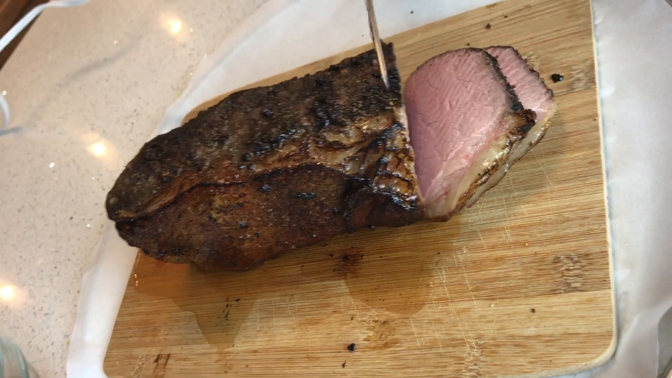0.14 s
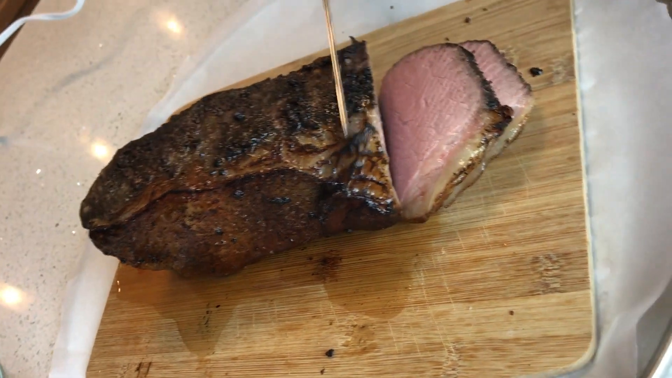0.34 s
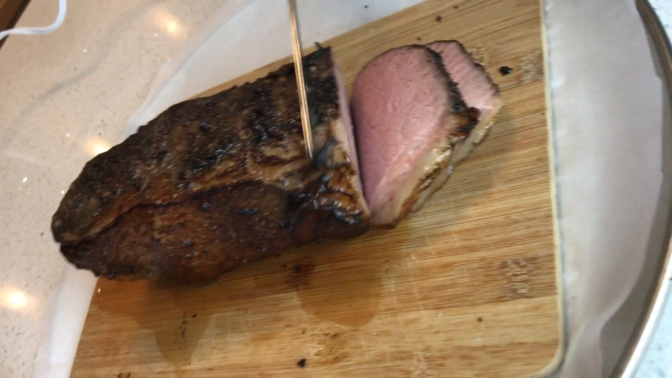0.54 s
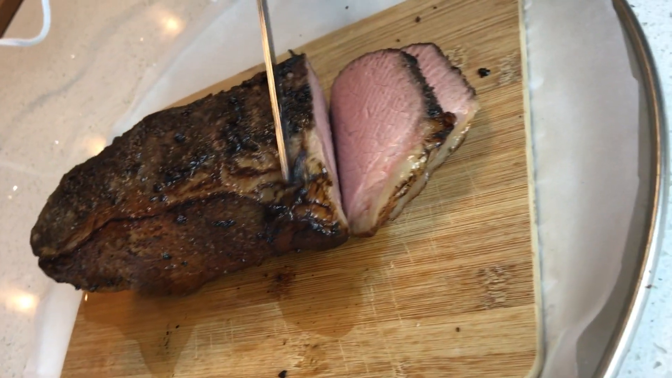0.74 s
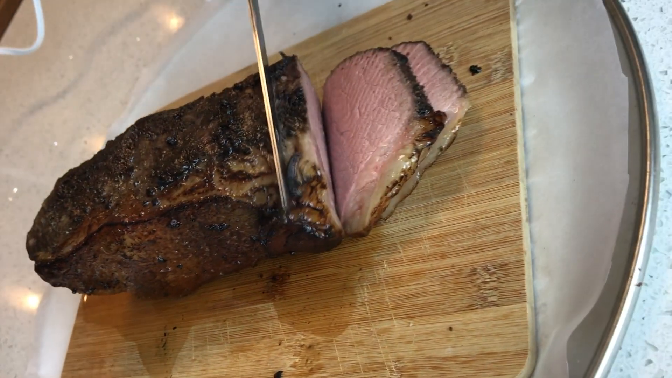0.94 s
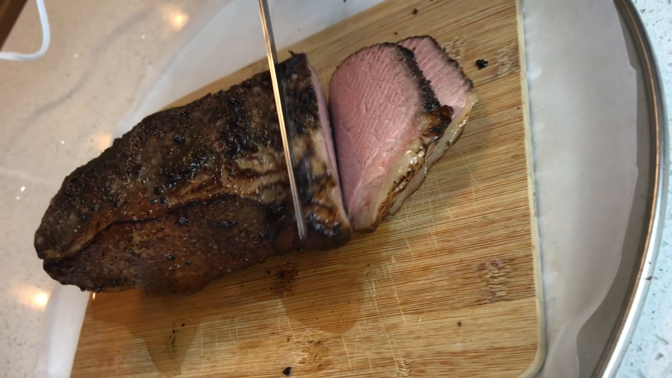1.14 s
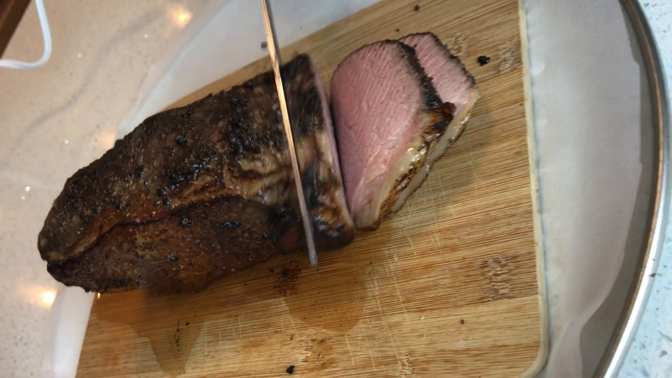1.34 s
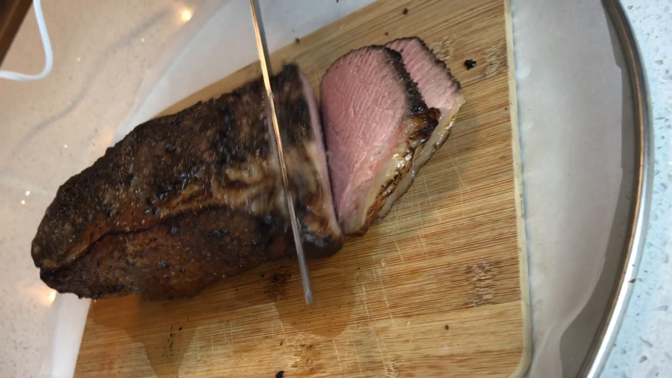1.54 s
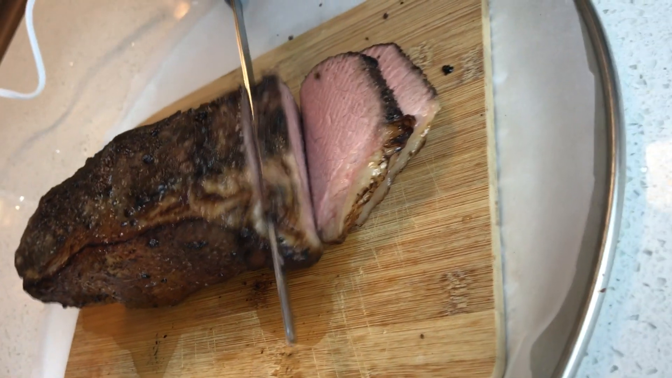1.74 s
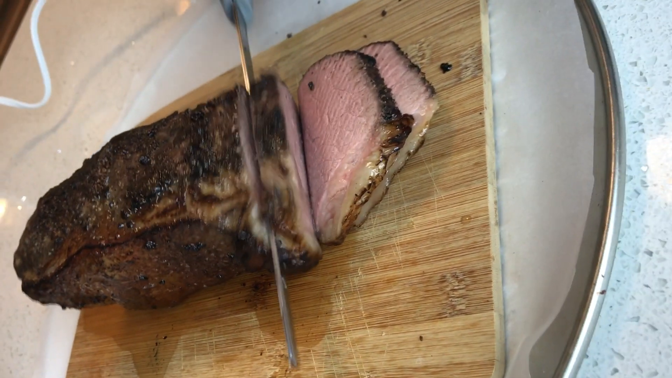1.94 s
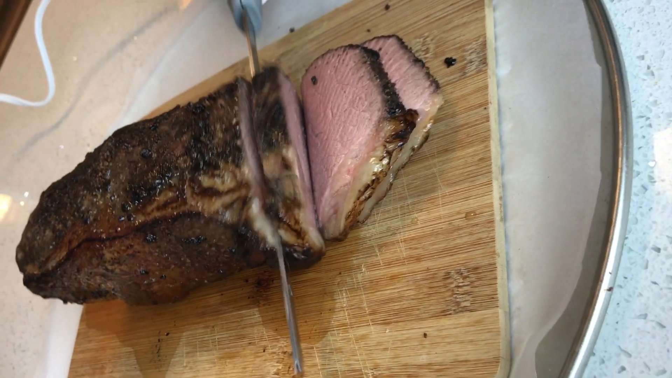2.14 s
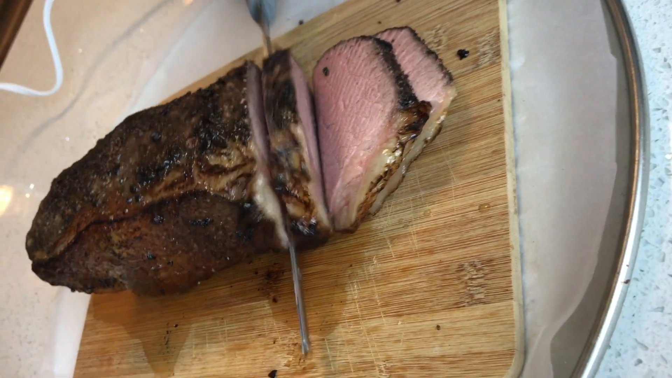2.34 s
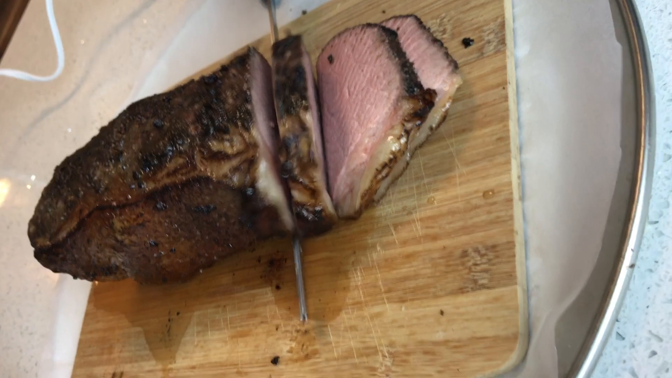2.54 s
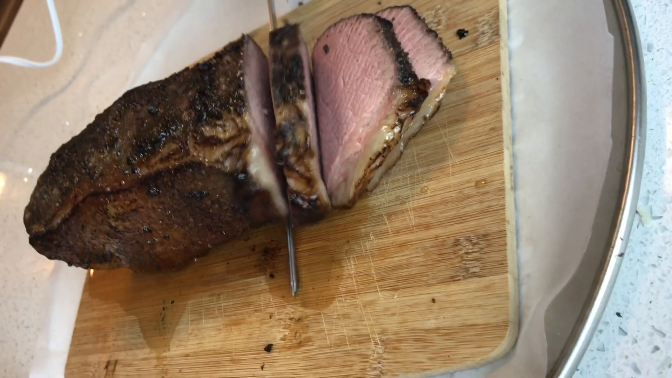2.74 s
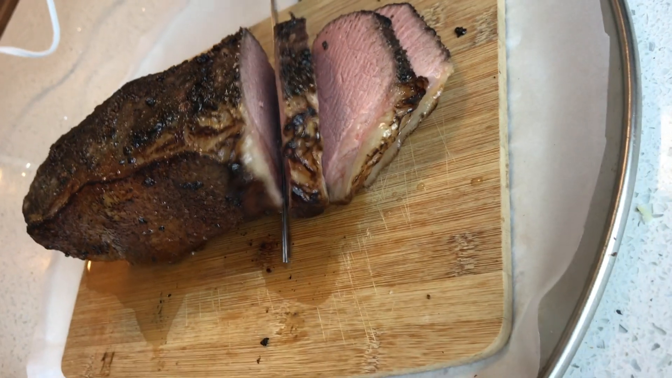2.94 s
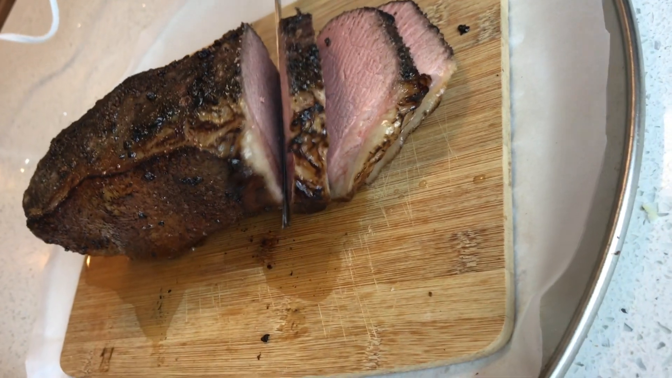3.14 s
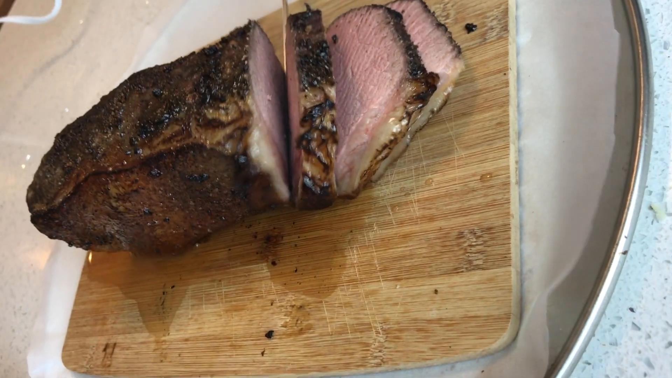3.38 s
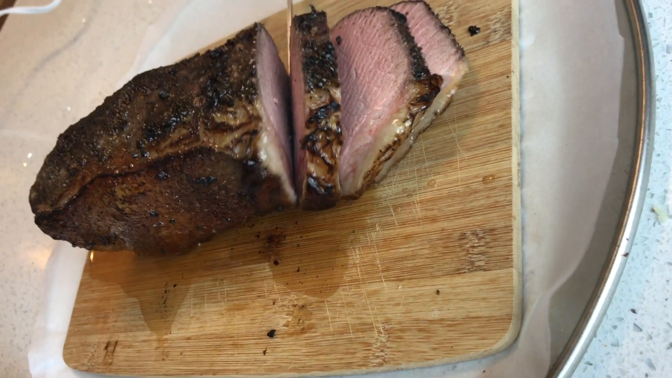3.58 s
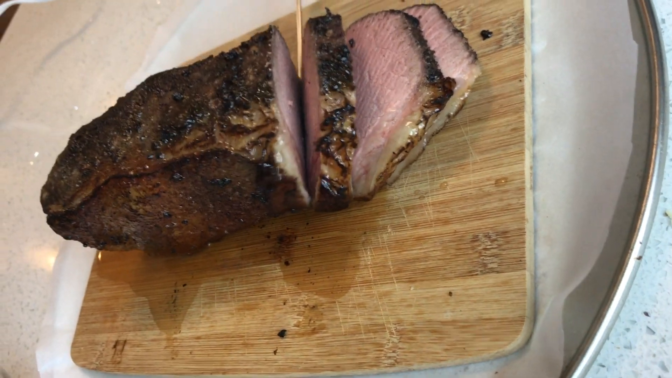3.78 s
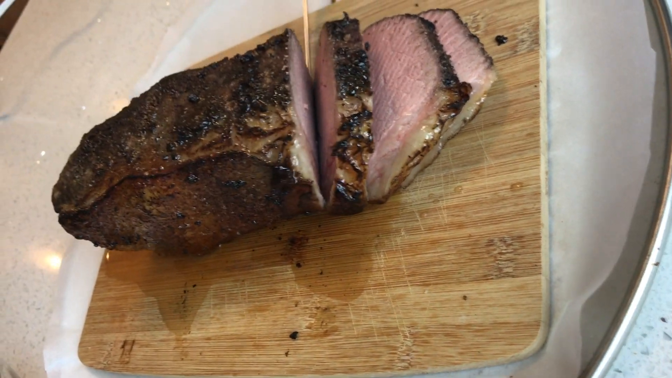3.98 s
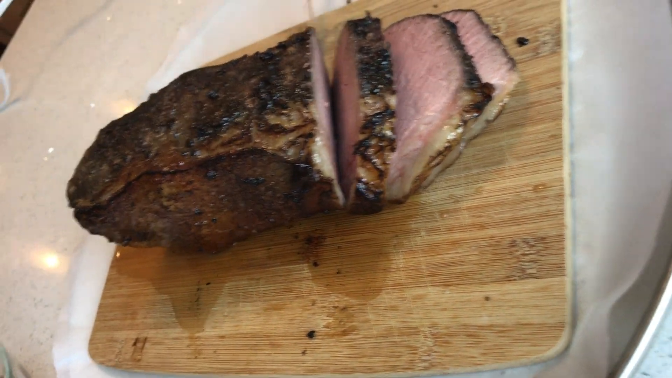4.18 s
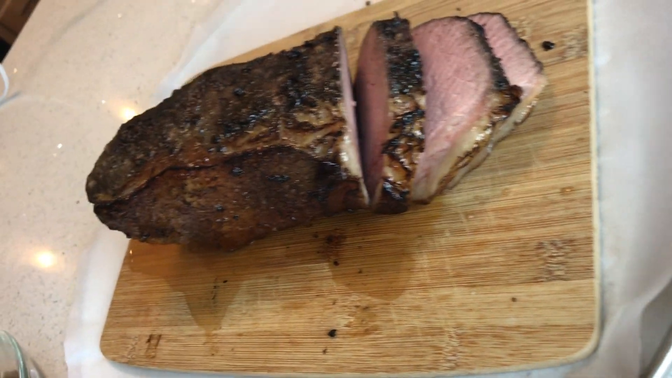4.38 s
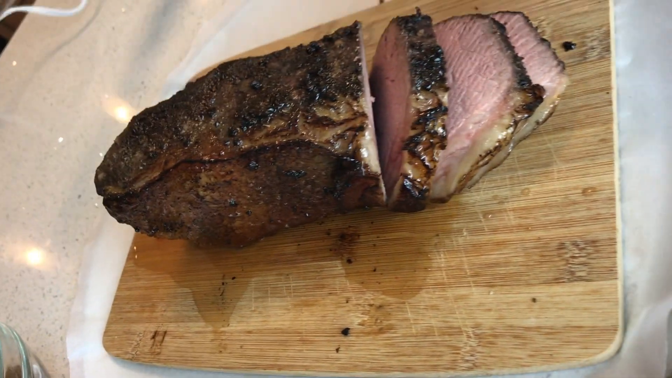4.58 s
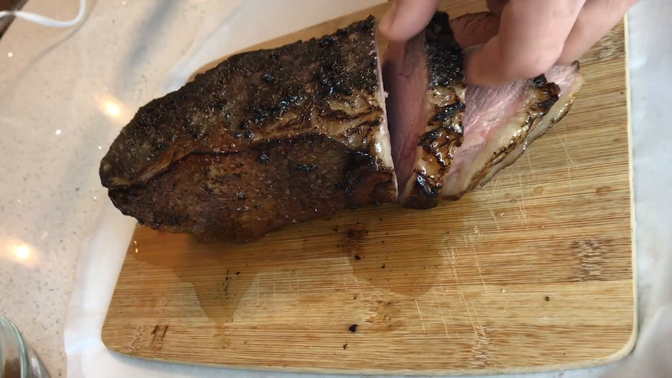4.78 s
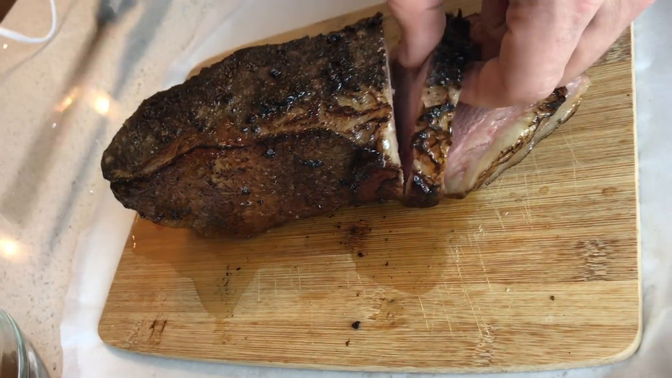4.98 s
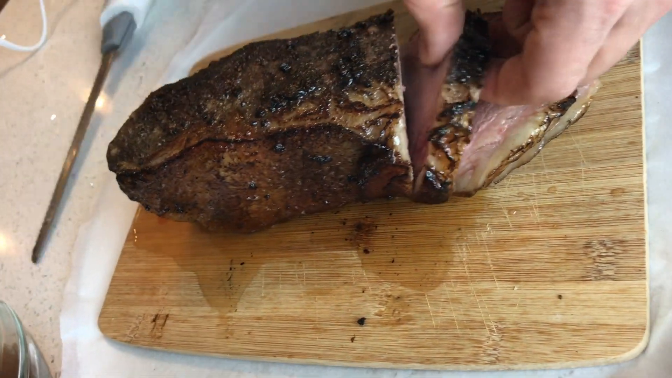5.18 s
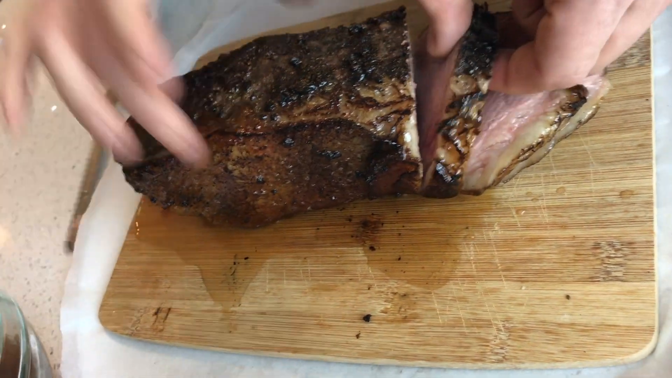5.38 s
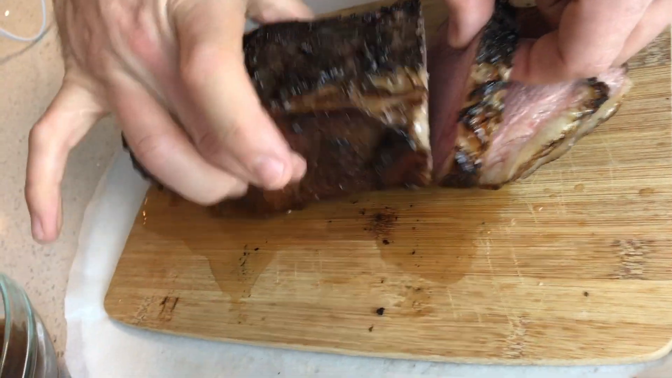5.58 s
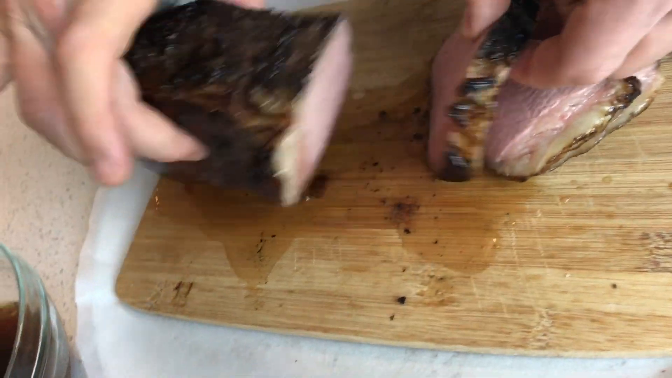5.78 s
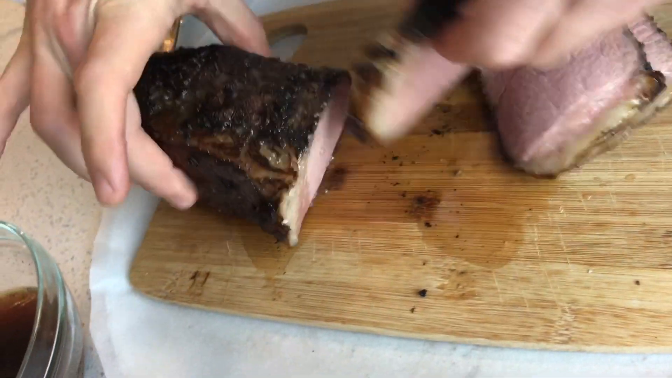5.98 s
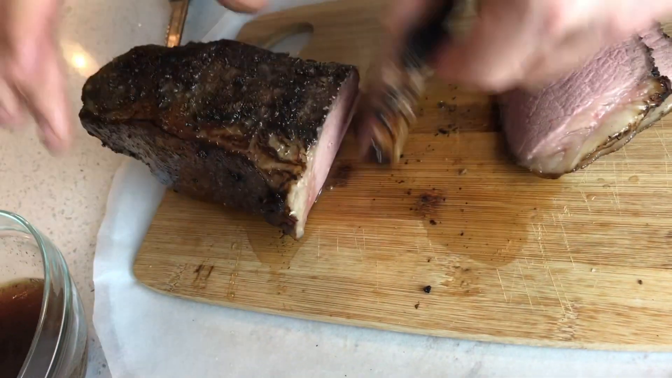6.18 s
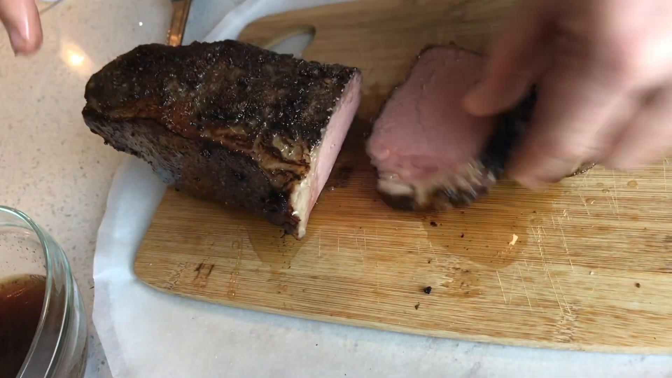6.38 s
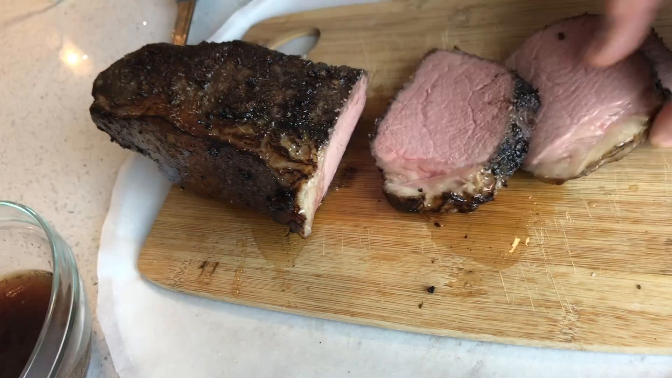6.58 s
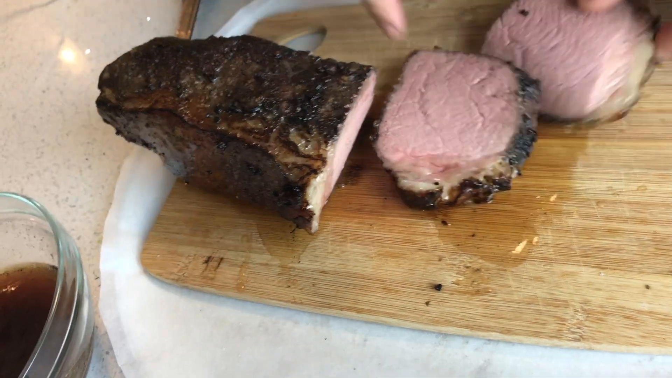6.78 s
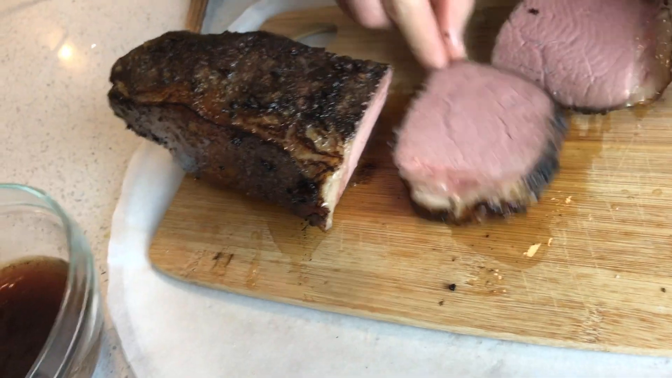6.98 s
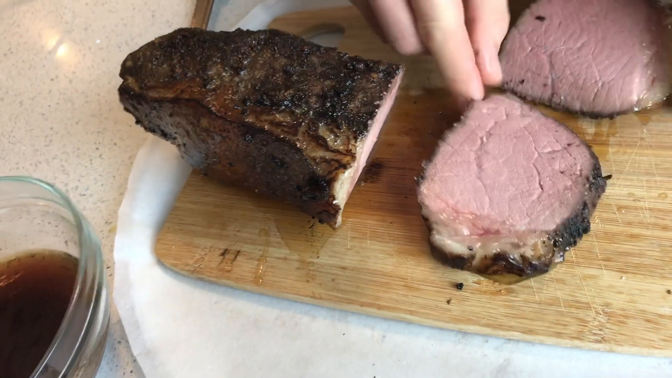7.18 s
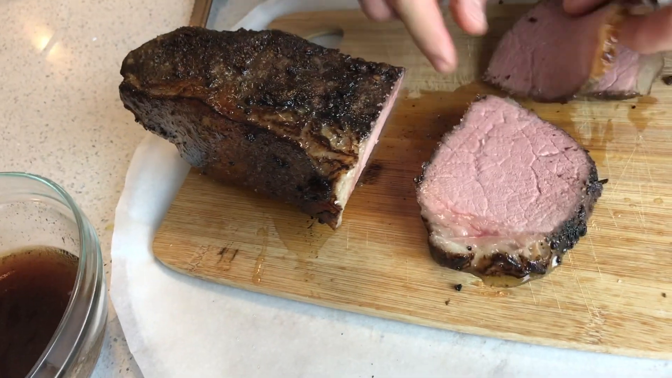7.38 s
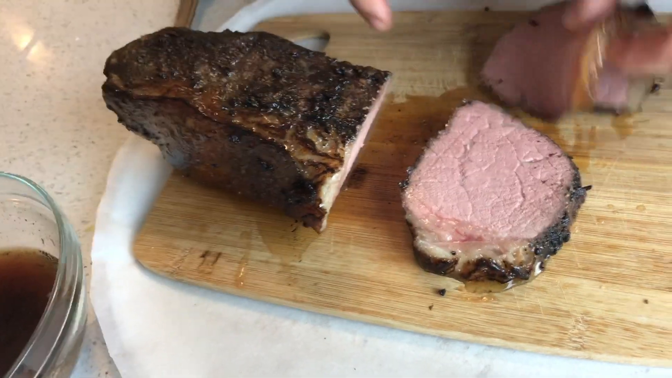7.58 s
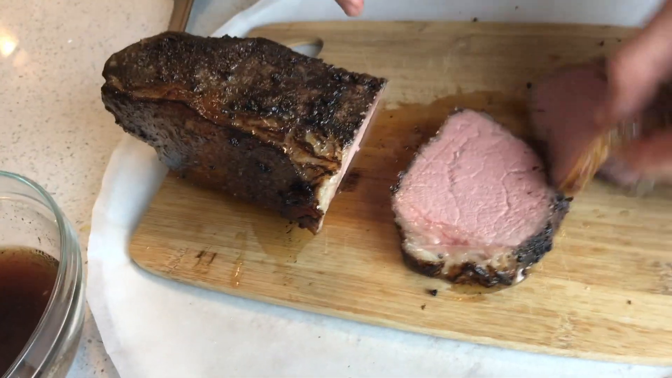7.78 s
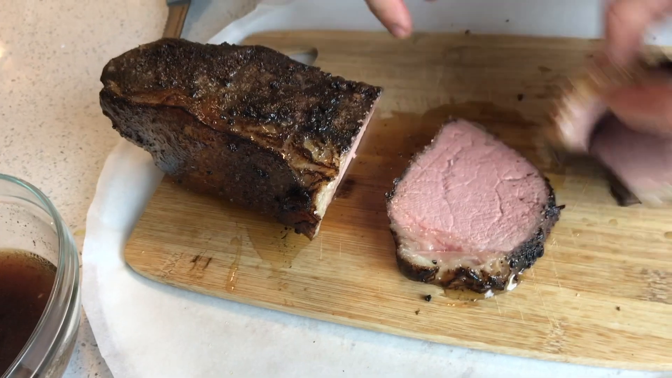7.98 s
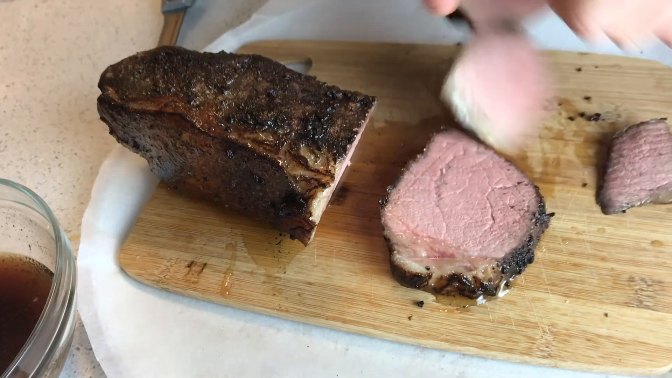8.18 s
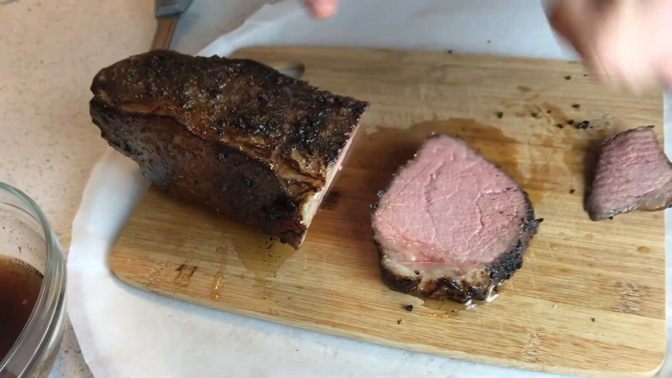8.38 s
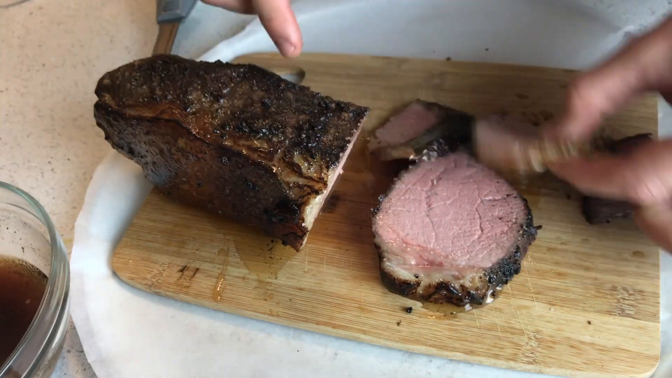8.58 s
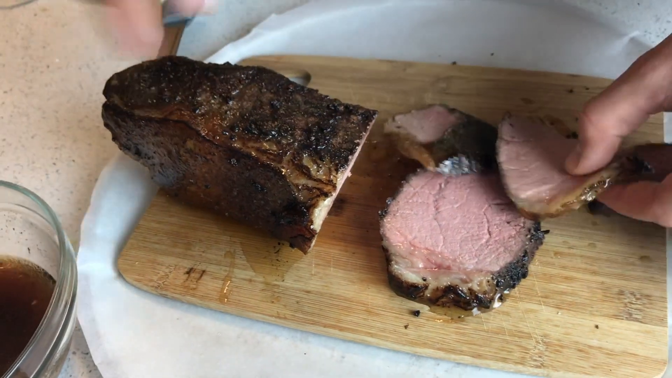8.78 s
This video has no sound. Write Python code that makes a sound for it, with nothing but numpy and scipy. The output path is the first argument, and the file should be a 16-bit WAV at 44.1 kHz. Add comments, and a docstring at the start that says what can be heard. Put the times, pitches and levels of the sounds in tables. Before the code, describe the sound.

An electric carving knife spins up at once, its high, gritty whine rising over the first second above a grinding hiss and a fast blade flutter. The pitch sags as it saws through a roast, lowest near 2.7 seconds, then creeps back up. From about 2.8 seconds the blades rattle harder against a wooden cutting board, with sharp clicks near 3.9 and 4.2. The power cuts at 4.2 and the whine falls away, gone by 5.8. Meanwhile the knife is laid down with clacks and low counter bumps between 5.0 and 5.3, and another clack at 5.6. A light knock follows at 6.0 and a crisp tick at 6.3. Then it is much quieter: hands slide wet slices over the board with faint rubs and tiny ticks, and a soft smack near 8.6. Everything is close, in a slightly reverberant kitchen with low room tone.

```python
"""A rising, gritty whine: an electric carving knife spins up, sags as it saws through a roast, rattles
against the cutting board and coasts to rest. Meshing gears make the whine, friction noise rings the
plastic housing, and the blades slap in every stroke. The knife is laid down with clacks and low bumps
that ring the kitchen counter; hands then push the roast aside and slide the wet slices about,
with soft rubs, smacks and ticks over the murmur of a quiet kitchen."""
import sys
import numpy as np
from scipy import signal
from scipy.fft import rfft, irfft, next_fast_len
from scipy.io import wavfile
from scipy.ndimage import uniform_filter1d

SR = 44100
rng = np.random.default_rng(int(sys.argv[2]) if len(sys.argv) > 2 else 0)


def pcm_store(signal):
    """Save signal as 16-bit PCM."""
    levels = np.round(np.clip(np.atleast_2d(signal), -1, 1) * 32767)
    wavfile.write(sys.argv[1], SR, levels.astype(np.int16).T)


N = 389403
TIME = np.arange(N) / SR


def gain_of(db):
    """Decibels to amplitude."""
    return 10 ** (np.asarray(db) / 20)


def unit_rms(x):
    """Normalisation to rms 1."""
    return x / np.sqrt(np.mean(x ** 2) + 1e-20)


def curve(points):
    """Linear interpolation of (time, value) points over the whole scene."""
    return np.interp(TIME, *np.transpose(points))


def spectrum_at(points, hz):
    """Interpolation of (frequency, value) points on a log frequency axis."""
    f, value = np.transpose(points)
    return np.interp(np.log(hz + 1), np.log(f + 1), value)


def filtered(x, response):
    """Linear filtering: the spectrum of x is multiplied by response(hz)."""
    size = next_fast_len(len(x) + 4096)
    return irfft(rfft(x, size) * response(np.fft.rfftfreq(size, 1 / SR)), size)[:len(x)]


def modes(table, hz):
    """Modal superposition: the causal response of resonances of alternating sign."""
    return sum(gain_of(db) * width / (width + 2j * (hz - f)) * (-1) ** k
               for k, (f, width, db) in enumerate(table))


def wander(rate_hz):
    """Random drift: low-passed noise of rms 1."""
    coarse = rng.standard_normal(N // 32 + 2)  # one value in 32 samples
    coarse = filtered(coarse, lambda hz: 1 / (1 + (hz / 32 / rate_hz) ** 4))
    return np.interp(np.arange(N) / 32, np.arange(len(coarse)), unit_rms(coarse))


def bell(hz, centre_hz, octaves):
    """A Gaussian hump on a log frequency axis."""
    return np.exp(-.5 * (np.log2((hz + 1) / centre_hz) / octaves) ** 2)


def swell_db(peak_s, half_width_s):
    """A Gaussian envelope in time, 6 dB down at half_width_s from its peak."""
    return -6 * ((TIME - peak_s) / half_width_s) ** 2


# gear mesh under power (time [s], frequency [Hz])
POWERED_MESH = [(0.0, 2784), (0.07, 2937), (0.2, 3388), (0.35, 3690), (0.55, 3900), (0.8, 3995),
                (1.0, 3986), (1.2, 3936), (1.8, 3750), (2.0, 3651), (2.2, 3500), (2.45, 3360), (2.7, 3316),
                (3.0, 3345), (3.6, 3408), (3.9, 3502), (4.22, 3635)]
TEETH_PER_STROKE, SHAFT_TURNS_PER_STROKE = 88, 11
POWER_OFF_S, LAID_DOWN_S = 4.22, 5.085
POWER_OFF, COASTED_S = TIME > POWER_OFF_S, np.maximum(TIME - POWER_OFF_S, 0)

def mesh_frequency():
    """Mesh frequency follows motor speed: a quick loss as the current ends, then steady friction."""
    quick_loss_hz = 583 * (1 - np.exp(-COASTED_S / .18))
    friction_loss_hz = 1880 * COASTED_S
    return np.maximum(curve(POWERED_MESH) - quick_loss_hz - friction_loss_hz, 50)


# mesh fundamental (time [s], level [dB])
MESH_LEVEL = [(0, -44), (.3, -36), (.65, -35.5), (.9, -39.5), (1.1, -36.5), (1.35, -41), (1.55, -36),
              (1.9, -34), (2.2, -34.5), (2.5, -50), (2.8, -52), (3.1, -42), (3.6, -42), (4.2, -41),
              (4.3, -52), (4.45, -50), (4.6, -46.5), (4.8, -49), (5.0, -60), (5.8, -80)]
# tones beside the mesh, each loudest as it crosses a resonance
# (multiple of the stroke rate [1], level [dB], resonance [Hz], bandwidth [Hz])
MESH_SIDEBANDS = [(85.25, -45, 3720, 240), (90.9, -45, 3520, 420)]
# hum of the board, twice a stroke, while the blades press on it (time [s], level [dB])
BOARD_HUM = [(0, -90), (2.78, -80), (2.84, -61), (3.45, -61), (3.7, -56), (4.0, -53), (4.2, -54),
             (4.3, -75), (5.8, -90)]
# mesh overtones (multiple of the mesh frequency [1], relative level [dB])
MESH_OVERTONES = [(3, -4), (4, 3), (5, -8), (6, 4), (8, 0), (10, -1)]
# magnetic pull on the shaft (multiple of the shaft speed [1], level relative to the grinding [dB])
SHAFT_ORDERS = [(1, -27), (2, -19), (3, -22)]
# tones that sing out in turn as the blades sink; the row at 264 is the third harmonic of the mesh (multiple of
# the stroke rate [1], level [dB], peak time [s], half-width [s])
STROKE_ORDERS = [(4, -63, 3.6, .8), (4, -60, 2.25, .25), (6, -57, 4.05, .25), (7, -59, 3.0, .25),
                 (10, -56, 3.65, .3), (12, -56.5, 3.85, .4), (13, -54, 3.1, .3), (14, -52, 4.05, .2),
                 (15, -55, 3.0, .3), (19, -55, 1.3, .7), (19, -54, 3.1, .35), (20, -51, 3.05, .3),
                 (21, -48, 3.05, .4), (22, -49, 2.7, .7), (23, -45.5, 3.2, .9), (25, -52, 1.15, .4),
                 (33, -50, 2.3, .3), (11, -55, .9, .6), (231, -61, 1.2, .35), (264, -60, 2.2, .9)]

def whine(strokes, mesh_hz, grind_db, second_harmonic_db):
    """Periodic forcing: gears, shaft and blades radiate fluttering multiples of the stroke rate."""
    out, phase = np.zeros(N), 2 * np.pi * strokes
    tones = [(TEETH_PER_STROKE, curve(MESH_LEVEL)), (2 * TEETH_PER_STROKE, second_harmonic_db)]
    for order, db, hz, width in MESH_SIDEBANDS:
        detuning = 2 * (mesh_hz * order / TEETH_PER_STROKE - hz) / width
        tones.append((order, db - 10 * np.log10(1 + detuning ** 2) + 1.2 * wander(4) - 12 * POWER_OFF))
    for order, db in tones:
        amplitude = np.sqrt(2) * gain_of(db + 2.2 * wander(30))
        out += amplitude * np.sin(order * (phase + 2 * np.pi * .0006 * wander(35)))
    out += np.sqrt(2) * gain_of(curve(BOARD_HUM)) * np.sin(2 * phase)
    # the overtones stand out once the power is off, until the counter damps them
    overtone_db = grind_db - 33 + 13.5 * np.minimum(COASTED_S / .55, 1) - 3 * (TIME > LAID_DOWN_S)
    for order, db in MESH_OVERTONES:
        housing_db = 5 * bell(order * mesh_hz, 7500, .2)  # a swell on crossing a housing resonance
        amplitude = gain_of(overtone_db + db + housing_db + 3.5 * wander(11))
        out += amplitude * np.sin(order * TEETH_PER_STROKE * phase)
    powered = ~POWER_OFF
    for order, db in SHAFT_ORDERS:
        amplitude = powered * gain_of(grind_db + db + 2.5 * wander(8))
        cycles = order * SHAFT_TURNS_PER_STROKE * strokes + .07 * wander(14)
        out += amplitude * np.sin(2 * np.pi * cycles)
    for order, db, peak_s, half_width_s in STROKE_ORDERS:
        amplitude = powered * np.sqrt(2) * gain_of(db + swell_db(peak_s, half_width_s) + 2.5 * wander(14))
        cycles = order * strokes + rng.random() + .1 * wander(14)
        out += amplitude * np.sin(2 * np.pi * cycles)
    return out


# broad response of the plastic housing (frequency [Hz], relative level [dB])
HOUSING_SPECTRUM = [(120, -52), (200, -17.5), (519, -13.5), (612, -6.5), (777, -11), (1230, -2),
                    (1420, -9.5), (1770, -3.5), (2170, -9), (3690, -7), (5330, -13.5), (7140, -10.5),
                    (10300, -15.5), (13100, -16), (16000, -21.5)]
# resonances of its shell (frequency [Hz], bandwidth [Hz], relative level [dB])
SHELL_MODES = [(1225, 630, -14.5), (1530, 180, -7.5), (2940, 300, 1.5), (3930, 1200, -3.5), (8900, 91, -22),
               (12600, 500, -18.5)]
# rough blade rings that come and go with the grip of the meat
# (frequency [Hz], width [octaves], level [dB], peak time [s], half-width [s])
BLADE_RINGS = [(2810, .03, -46, 2.1, .5), (2640, .02, -45, 3.26, .17), (2300, .04, -43, 4.08, .15),
               (3710, .022, -44, 3.48, .22), (4110, .03, -47, 3.15, .3), (4150, .08, -55, 4.8, .4)]
# boom of the meat around the sinking blades (time [s], level [dB])
MEAT_BOOM = [(0, -102), (1, -61.5), (2.5, -48), (2.95, -42), (3.5, -46.5), (4.22, -57.5), (4.26, -56),
             (5.8, -65.5)]

def grinding(strokes, level_db):
    """Source and filter: friction noise throbs with the stroke and excites housing, blades and meat."""
    throb = 1 + .11 * np.cos(4 * np.pi * (strokes - .1)) + .059 * np.cos(6 * np.pi * (strokes - .05))
    grit = rng.standard_normal(N) * throb * gain_of(1.6 * wander(650) + .19 * wander(31.6))
    housing = lambda hz: gain_of(spectrum_at(HOUSING_SPECTRUM, hz)) * (1 + .74 * abs(modes(SHELL_MODES, hz)))
    spectra = signal.stft(unit_rms(filtered(grit, housing)), nperseg=512)[2]
    # the noise swells and thins in drifting patches of frequency and time
    patches = uniform_filter1d(rng.standard_normal(spectra.shape), size=7, axis=0)
    patch_db = 1.1 * unit_rms(uniform_filter1d(patches, size=9, axis=1))
    body = unit_rms(signal.istft(spectra * gain_of(patch_db), nperseg=512)[1][:N])
    treble = filtered(body, lambda hz: 1 / (1 + (5000 / (hz + 1)) ** 4))
    treble_loss = (1 - gain_of(-3 - .7 * POWER_OFF)) * treble
    fizz = filtered(body, lambda hz: 1 / (1 + (8500 / (hz + 1)) ** 8))
    fizz *= gain_of(8 * COASTED_S) - 1  # the highest hiss fades more slowly while coasting
    rings = np.zeros(N)
    for centre_hz, octaves, db, peak_s, half_width_s in BLADE_RINGS:
        band = unit_rms(filtered(grit, lambda hz: bell(hz, centre_hz, octaves)))
        rings += gain_of(db + swell_db(peak_s, half_width_s)) * band
    boom = gain_of(curve(MEAT_BOOM)) * unit_rms(filtered(grit, lambda hz: bell(hz, 1000, .78)))
    return gain_of(level_db) * (body - treble_loss + fizz) + boom + rings


# the three slaps in a stroke (position [strokes], decay time [ms], treble shelf [dB])
SLAP_SHAPES = [(.012, 1.9, 4), (.47, 2.5, -13), (.69, 1.1, 9)]
# blades pressed on the board (frequency [Hz], bandwidth [Hz], relative level [dB])
PRESSED_MODES = [(866, 90, 2), (1290, 83, -4), (2660, 130, 5), (3370, 220, 0), (3730, 110, -4),
                 (4130, 110, 0), (5170, 300, -19), (7720, 400, -8), (12600, 800, -12)]
# blades ringing freely (frequency [Hz], bandwidth [Hz], relative level [dB])
FREE_MODES = [(960, 82, -20), (1230, 100, 4), (2360, 260, 9.5), (2680, 290, 7.5), (3620, 150, -3),
              (3850, 180, -17), (4450, 350, 4), (5420, 79, 5.5), (8760, 2300, -14), (13700, 350, -9)]

def blade_slaps(strokes, levels_db, lifted):
    """Impact excitation: in every stroke the blades slap and ring the modes of the steel."""
    out, free_share = np.zeros(N), np.clip(lifted, 0, 1)
    stroke_hz = np.maximum(np.gradient(strokes) * SR, 1)
    for (position, decay_ms, treble_db), db in zip(SLAP_SHAPES, levels_db):
        cycle = strokes - position + .006 * wander(20)
        count = np.floor(cycle).astype(int)
        since_ms = 1000 * (cycle % 1) / stroke_hz
        scatter_db = .8 * rng.standard_normal(400)[count % 400]
        tap = .9 * np.sqrt(decay_ms * SR / 2000) * (np.diff(count, prepend=0) > 0)
        rattle = rng.standard_normal(N) * np.exp(-since_ms / decay_ms) * (1 - np.exp(-since_ms / .5))
        burst = (tap + rattle) * gain_of(scatter_db)
        shelf = lambda hz: gain_of(treble_db / (1 + (2000 / (hz + 1)) ** 2))
        for table, share in ((PRESSED_MODES, 1 - free_share), (FREE_MODES, free_share)):
            ring = filtered(burst, lambda hz: shelf(hz) * (modes(table, hz) + .05 * bell(hz, 5000, 1.3)))
            out += gain_of(db) * np.sqrt(share) * unit_rms(ring)
    return filtered(out, lambda hz: 1 / (1 + (300 / (hz + 1)) ** 2))  # the slaps carry little bass


# stages of the cut: into the meat, sawing the board, lifting, coasting (start [s], first slap [dB],
# second slap [dB], third slap [dB], lift off the board [0-1], second mesh harmonic [dB])
CUT_STAGES = [(0, -46.5, -63, -65.5, 0, -52), (1.719, -42.5, -46.5, -49, 0.5, -48.5),
              (2.4, -48.5, -62, -46, 0.5, -51), (2.83, -38.5, -44.5, -48, 0.5, -52.5),
              (3.04, -36, -50.5, -63, 0.18, -47.5), (3.195, -39.5, -47, -58, 0.08, -45.5),
              (3.27, -34, -42, -54, 0.33, -46.5), (3.374, -37, -47.5, -57, 0.08, -47),
              (3.452, -37, -46.5, -56, 0.22, -43), (3.866, -34.5, -46.5, -35, 0.45, -44),
              (4.041, -33, -36, -39, 0.68, -50), (4.235, -56, -56, -53.5, 1, -55.5),
              (4.66, -62.5, -49.5, -65, 0.2, -56.5), (5.0, -62.5, -71.5, -61, 0.4, -62.5),
              (5.09, -69, -76, -68.5, 0.2, -85)]

def knife(blend_s=.014, slap_lead_strokes=.015):
    """A common drive: one motor speed sets the whine, the grinding and the rhythm of the slaps."""
    mesh_hz = mesh_frequency()
    strokes = np.cumsum(mesh_hz) / SR / TEETH_PER_STROKE
    starts, *columns = np.transpose(CUT_STAGES)
    stage = np.searchsorted(starts, TIME, "right") - 1
    blended = [uniform_filter1d(column[stage], round(blend_s * SR)) for column in columns]
    *slap_dbs, lifted, second_harmonic_db = blended
    # grinding follows the speed and drops with the current
    grind_db = -31.5 + 9.5 * np.log2(mesh_hz / 3900) - 2.5 * POWER_OFF
    fade_out = np.clip((5.85 - TIME) / .14, 0, 1)
    return fade_out * (whine(strokes, mesh_hz, grind_db, second_harmonic_db) + grinding(strokes, grind_db)
                       + blade_slaps(strokes + slap_lead_strokes, slap_dbs, lifted))


# background of the room (frequency [Hz], relative level [dB])
MURMUR_SPECTRUM = [(28, -49.5), (42, -10), (97, -12.5), (130, -1), (157, -8.5), (206, -4.5), (236, -13),
                   (301, -11), (344, -11), (476, -21.5), (531, -20), (607, -21), (1040, -24), (2110, -34),
                   (16000, -46)]

def room_murmur(level_db=-60.5):
    """Ambient noise: a low murmur under slow, random amplitude modulation."""
    noise = rng.standard_normal(N) * gain_of(2.86 * wander(2.2))
    murmur = filtered(noise, lambda hz: gain_of(spectrum_at(MURMUR_SPECTRUM, hz)))
    return gain_of(level_db) * unit_rms(murmur)


# decay of the kitchen (frequency [Hz], reverberation time T60 [s])
KITCHEN_T60 = [(150, 0.4), (1000, 0.6), (4000, 0.3), (7000, .21), (12000, 0.19)]

def reverberation(x):
    """Convolution with sparse reflections of random sign, each band decaying at its own rate."""
    echoes = np.zeros(SR // 2)
    arrivals = np.arange(200, len(echoes) - 20, 20) + rng.integers(0, 20, (len(echoes) - 201) // 20)
    echoes[arrivals] = rng.choice([-1., 1.], len(arrivals))
    hz, t, spectra = signal.stft(echoes, SR, nperseg=256)
    decay = gain_of(-60 * t / spectrum_at(KITCHEN_T60, hz)[:, None])
    tail = signal.istft(spectra * decay, SR, nperseg=256)[1]
    return signal.fftconvolve(x, tail / np.linalg.norm(tail))[:N]


# loose blades and wet meat letting go (time [s], level [dB], centre [Hz])
FAINT_TICKS = [(1.196, -34, 11500), (1.228, -40, 12500), (1.285, -39, 12500), (1.397, -32, 12500),
               (1.42, -30, 12500), (1.443, -36, 12500), (4.782, -32.5, 8400), (4.815, -44, 6500),
               (4.848, -43.5, 6000), (5.277, -37, 7000), (5.279, -42, 11300), (5.515, -43, 12500),
               (5.83, -55, 12900), (5.842, -56, 13000), (5.855, -55, 8800), (6.155, -51, 11000),
               (6.16, -59, 10500), (6.201, -63.5, 10100), (6.298, -47, 4880), (7.336, -59.5, 7100),
               (7.383, -55, 11000), (7.393, -53, 11800), (7.42, -62.5, 11000), (7.459, -62, 13100),
               (7.685, -59, 8000), (8.555, -50, 11100), (8.618, -56, 13400), (8.71, -58, 13600)]
# clacks and smacks of knife, board and meat
# (time [s], level [dB], centre [Hz], half-width [octaves], decay time [ms], relative room send [dB])
IMPACTS = [(3.876, -18, 4030, 1.1, 1.2, -13.5), (4.198, -20, 3540, 0.72, 0.71, -3),
           (4.223, -19, 4140, 0.37, 1.7, -16), (5.084, -18.5, 2130, 1.45, 7.6, -6),
           (5.085, -25, 12500, 0.39, 3.8, -6.5), (5.193, -23.5, 4000, 0.22, 2.3, -2),
           (5.193, -26, 10000, 0.9, 2.5, 0.5), (5.205, -22.5, 2230, 1.17, 2.1, -3.5),
           (5.296, -34, 2000, 1.26, 1.8, 3), (5.575, -23.5, 3500, 0.61, 3.5, -6.5),
           (5.576, -28.5, 7500, .5, 2.2, -12), (5.576, -43.5, 900, 1.1, 5, -7.5),
           (5.581, -24, 3380, 0.35, 3.4, -15), (5.594, -33, 3300, 0.51, 3, -17),
           (5.594, -37, 7460, 0.3, 2, -3), (5.6, -65, 3620, .05, 26, -11),
           (5.59, -45, 1820, 0.046, 22, -22), (5.588, -29, 2980, 0.44, 5.9, -30),
           (5.6, -54, 2500, 0.075, 98, -16), (5.733, -47, 2500, 1, 2.7, 1.5),
           (5.972, -32.5, 9000, .9, 1, -7), (5.973, -33.5, 2520, 1.6, 1.5, -3),
           (5.982, -41.5, 2870, 0.51, 5.5, -1.5), (5.991, -35.5, 1070, 0.3, 1.7, -6.5),
           (6.268, -9, 11800, 0.65, 0.36, -16.5), (6.269, -33, 2236, 1.48, 2.2, -10.5),
           (8.556, -33.5, 1090, 0.95, 3.7, -17), (8.572, -38, 824, 0.18, 1.5, -14),
           (8.574, -43, 8900, 1.9, 3.7, -9), (8.58, -61.5, 1240, 0.038, 44, -3)]

def ticks_and_clacks(stray_count=36):
    """Damped transients: returns direct noise bursts, and impulses in the same bands for the room."""
    out, ms = np.zeros((2, N + SR)), np.arange(6000) * 1000 / SR
    when, size, pitch = rng.random((stray_count, 3)).T
    strays = list(zip(5.9 + 2.9 * when, -71 + 6 * size, 2500 * 5.5 ** pitch))  # while the hands work
    tick_shape = (.4, 1.8, -8)  # (half-width [octaves], decay time [ms], relative room send [dB])
    events = IMPACTS + [(*tick, *tick_shape) for tick in FAINT_TICKS + strays]
    for start_s, db, hz, octaves, decay_ms, room_db in events:
        edges_hz = np.clip(hz * 2. ** np.array([-octaves, octaves]), 50, .48 * SR)
        band = signal.butter(2, edges_hz, "bandpass", fs=SR, output="sos")
        noise = rng.standard_normal(len(ms)) * np.exp(-ms / decay_ms) * (1 - np.exp(-ms / .4))
        bursts = signal.sosfilt(band, np.array([noise, ms == 0]))
        onset_rms = np.sqrt(2 * np.sum(bursts ** 2, 1, keepdims=True) / (decay_ms * SR / 1000))
        out[:, round(start_s * SR):][:, :len(ms)] += gain_of([[db], [db + room_db]]) * bursts / onset_rms
    return out[:, :N]


# soft blows on the counter (time [s], level [dB])
COUNTER_BLOWS = [(5.013, -26), (5.046, -39.5), (5.063, -33.5), (5.083, -19), (5.165, -34), (5.184, -32),
                 (5.202, -26.5), (5.22, -19.5), (5.229, -25), (5.993, -30.5), (6.067, -40.5), (6.271, -45)]
# resonances of the counter (frequency [Hz], relative level [dB], decay time T60 [s])
COUNTER_MODES = [(85, -15, .08), (129, -2, .045), (180, -4, .04), (260, -12, .04), (355, -3, .075),
                 (610, -14, .04), (1030, -14, .05)]

def counter_bumps():
    """Free vibration: each soft blow rings the damped modes of the counter in a different mixture."""
    out, t = np.zeros(N + SR), np.arange(SR // 2) / SR
    for start_s, db in COUNTER_BLOWS:
        ring = sum(gain_of(mode_db + 2 * rng.standard_normal() - 60 * t / t60) * np.sin(2 * np.pi * hz * t)
                   for hz, mode_db, t60 in COUNTER_MODES)
        ring *= 1 - np.exp(-t / .0012)
        out[round(start_s * SR):][:len(t)] += gain_of(db) * ring / abs(ring).max()
    # the bumps carry no deep bass
    return filtered(out[:N], lambda hz: 1 / (1 + (75 / (hz + 1)) ** 4))


# meat pushed over the wet board (start [s], duration [s], level [dB], brightness [0-1])
MEAT_PUSHES = [(6.273, 0.49, -68, 0.65), (6.672, .12, -51.5, 0.01), (6.831, 0.041, -53.5, 0.05),
               (7.008, 0.035, -59.5, 0.44), (7.096, .14, -69.5, .4), (7.628, 0.15, -66, 0.3),
               (7.759, 0.17, -62, 0.34), (8.163, 0.045, -66.5, 0.3), (8.771, .06, -63, 0.33)]

def sliding_meat(rise_s=.047, fall_db_per_s=400):
    """Sliding friction: grainy noise in a dull and a bright band swells and dies with each push."""
    out = np.zeros(N)
    rub = rng.standard_normal(N) * gain_of(2.2 * wander(150))
    dull = unit_rms(filtered(rub, lambda hz: bell(hz, 1600, 1)))
    bright = unit_rms(filtered(rub, lambda hz: bell(hz, 5500, 1)))
    for start_s, duration_s, db, brightness in MEAT_PUSHES:
        rise = np.clip((TIME - start_s) / rise_s, 0, 1) ** 2
        fall_db = fall_db_per_s * np.maximum(TIME - start_s - duration_s, 0)
        out += rise * gain_of(db - fall_db) * ((1 - brightness) * dull + brightness * bright)
    return out


def scene():
    """Superposition: the direct sound of each source, its reverberation and the room's murmur."""
    tool, bumps, slides = knife(), counter_bumps(), sliding_meat()
    clacks, clack_send = ticks_and_clacks()
    thinned_tool = filtered(tool, lambda hz: hz / (hz + 300))
    send = gain_of(-10.5) * thinned_tool + gain_of(-14) * bumps + gain_of(-12.5) * slides + clack_send
    return (tool + bumps + slides + clacks + reverberation(send) + room_murmur())[None]


def record(dry):
    """Band limiting: a narrow dip in the treble, then a steep low-pass."""
    dipped = filtered(dry[0], lambda hz: gain_of(-4 * bell(hz, 10340, .059)))
    low_pass = signal.firwin(511, 15900, window=("kaiser", 9), fs=SR)
    return signal.oaconvolve(dipped[None], low_pass[None], "same")


dry = scene()
out = record(dry)
pcm_store(out)
```